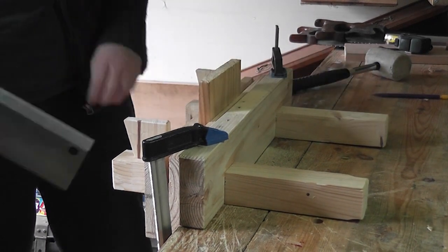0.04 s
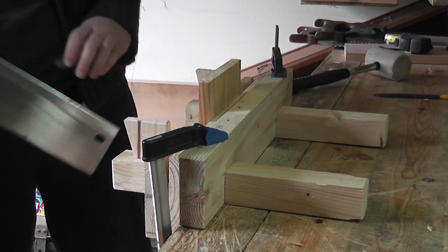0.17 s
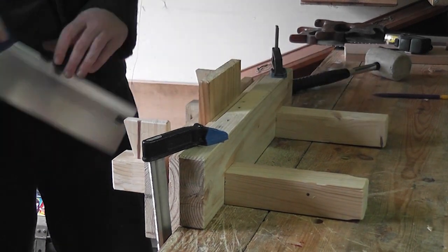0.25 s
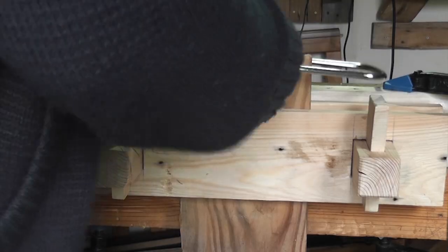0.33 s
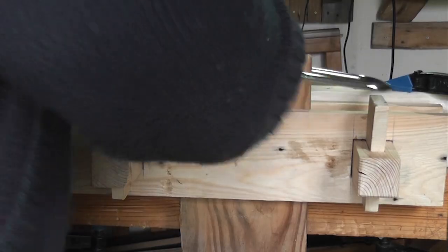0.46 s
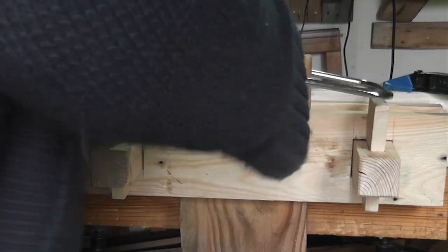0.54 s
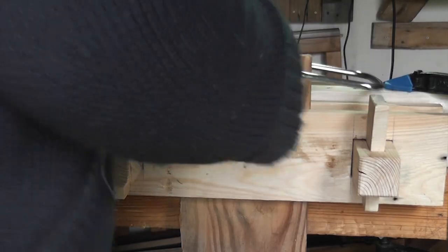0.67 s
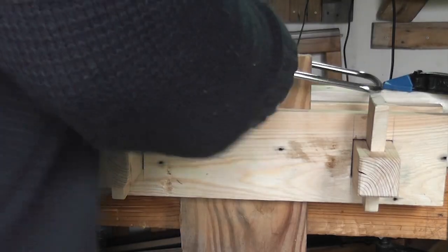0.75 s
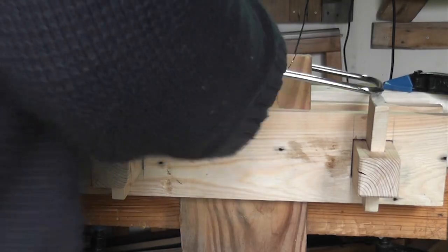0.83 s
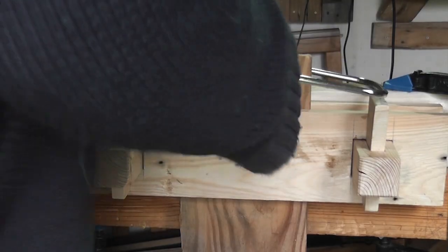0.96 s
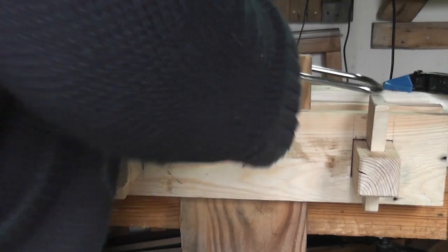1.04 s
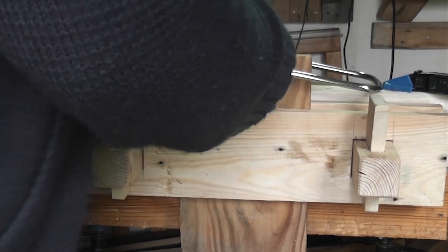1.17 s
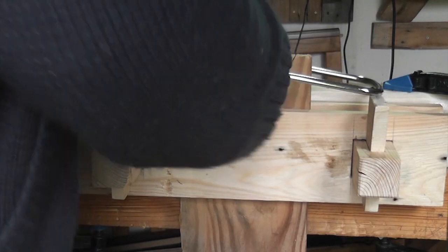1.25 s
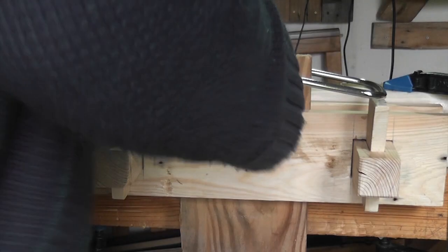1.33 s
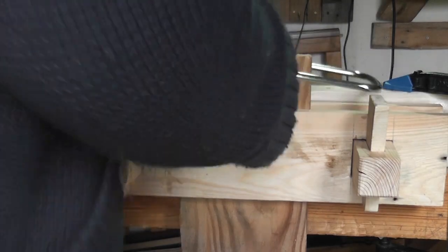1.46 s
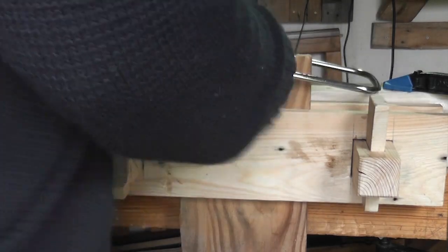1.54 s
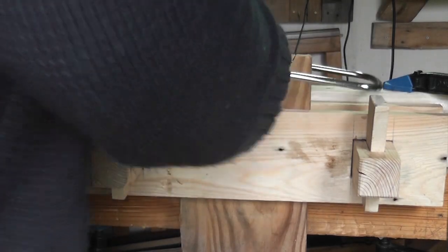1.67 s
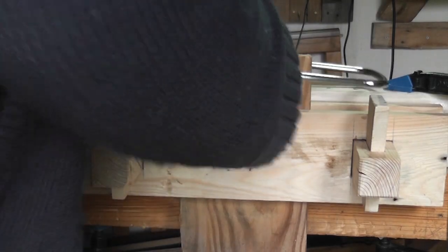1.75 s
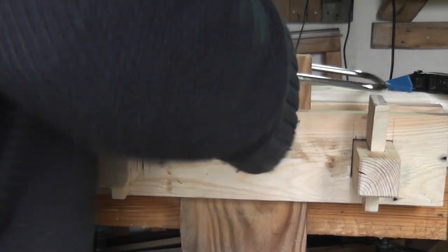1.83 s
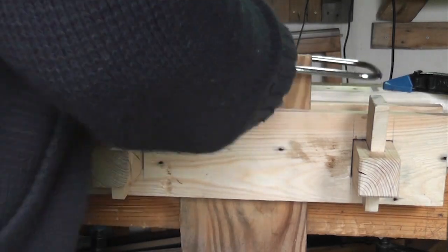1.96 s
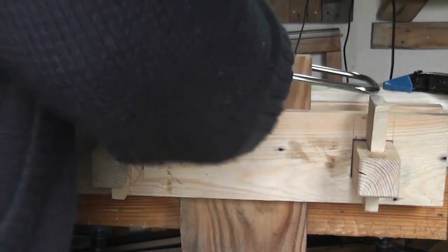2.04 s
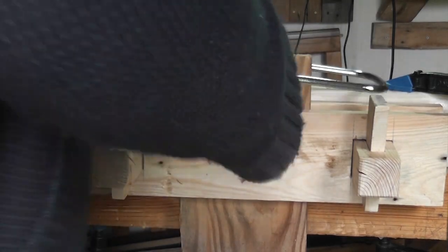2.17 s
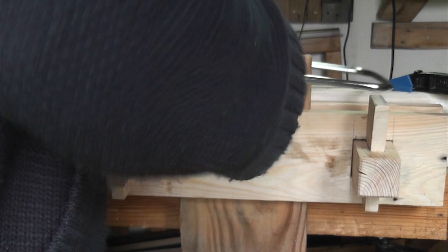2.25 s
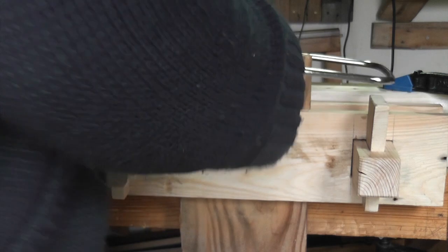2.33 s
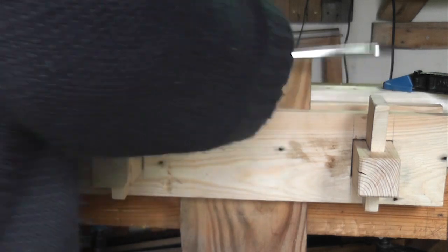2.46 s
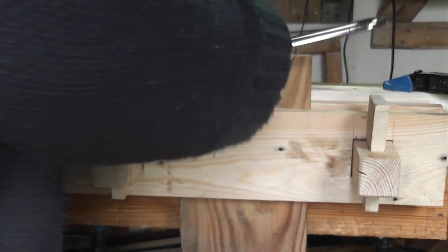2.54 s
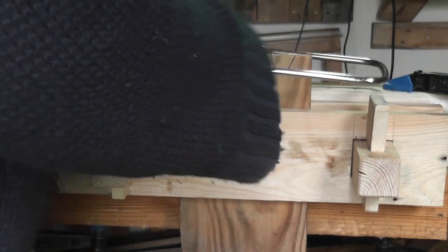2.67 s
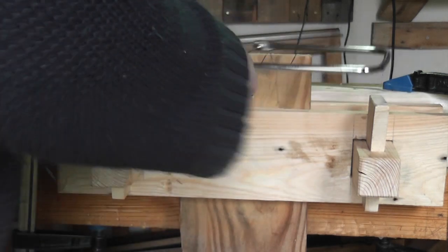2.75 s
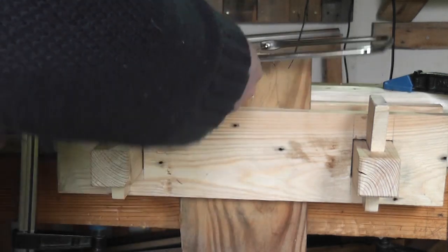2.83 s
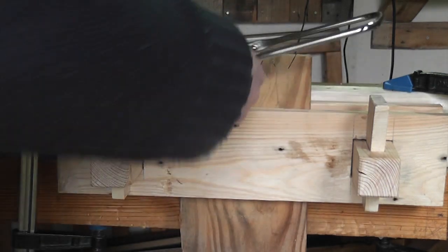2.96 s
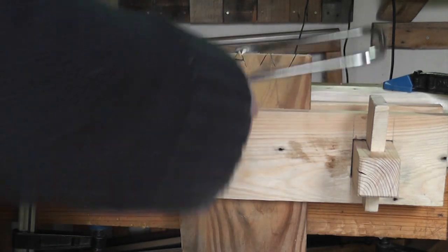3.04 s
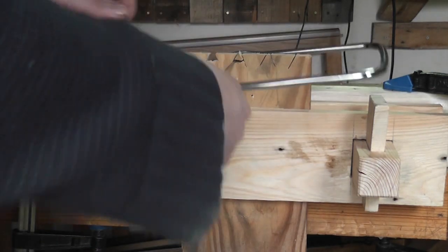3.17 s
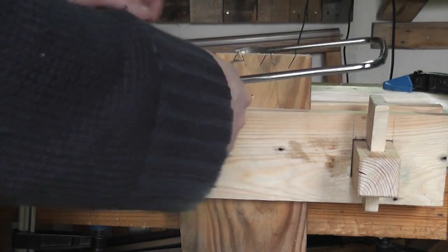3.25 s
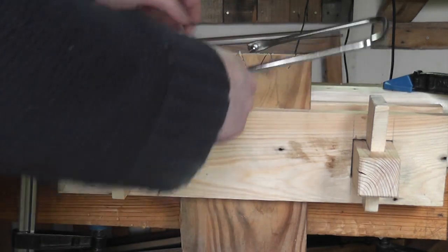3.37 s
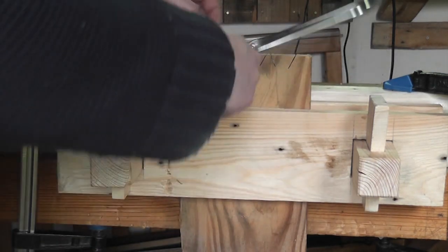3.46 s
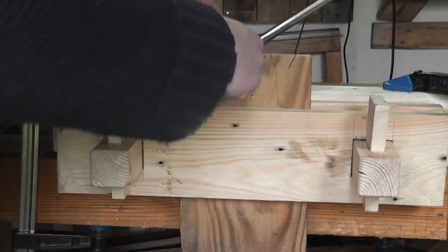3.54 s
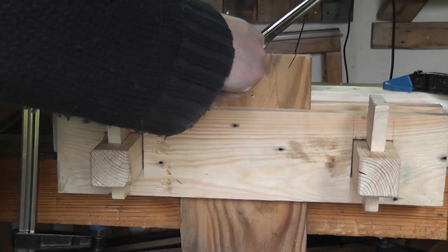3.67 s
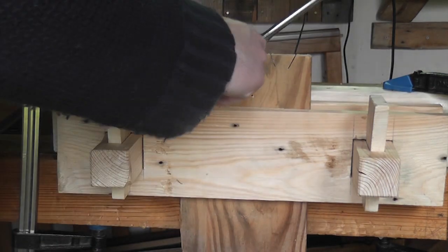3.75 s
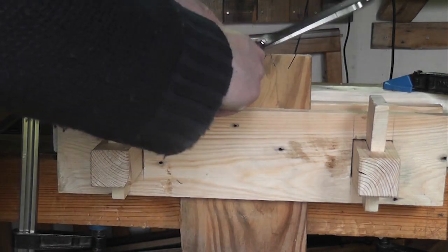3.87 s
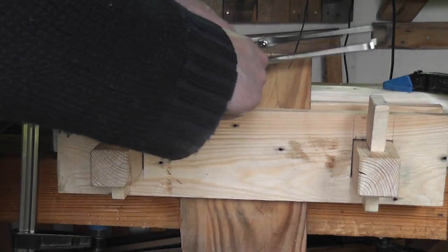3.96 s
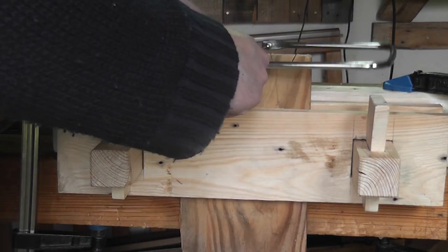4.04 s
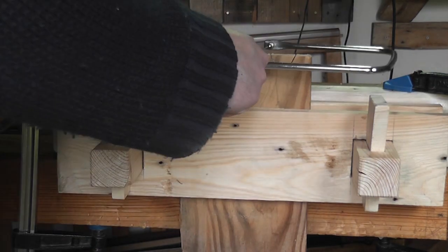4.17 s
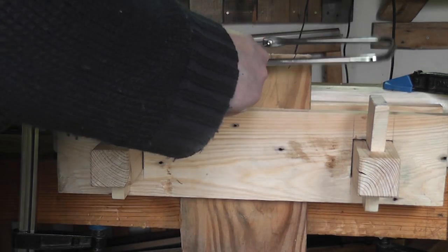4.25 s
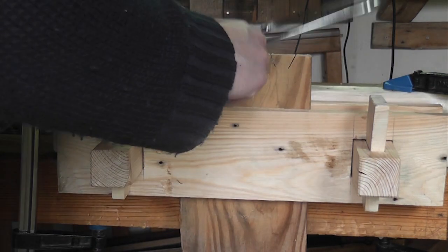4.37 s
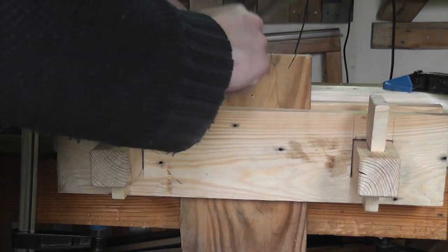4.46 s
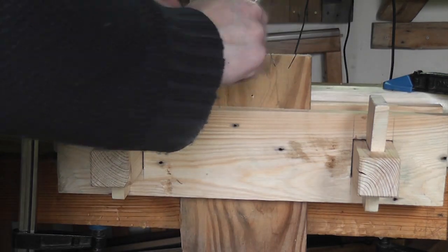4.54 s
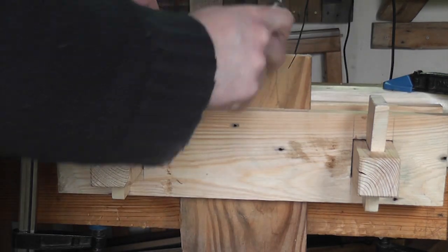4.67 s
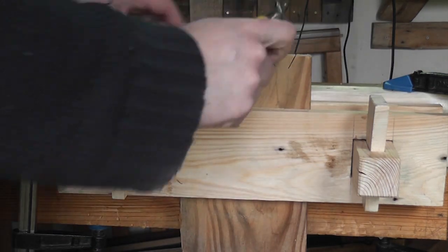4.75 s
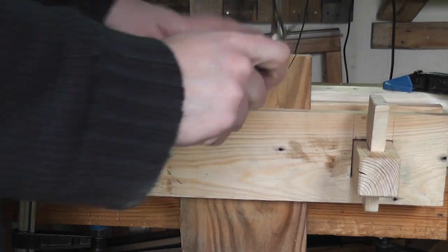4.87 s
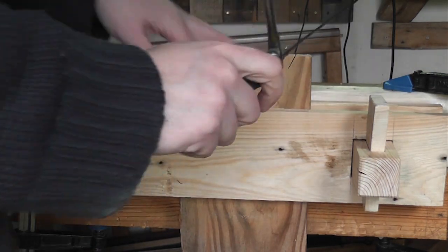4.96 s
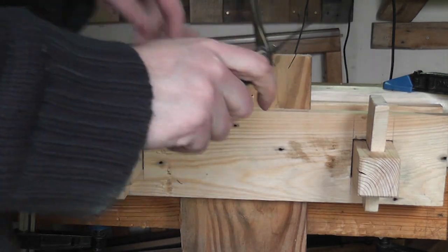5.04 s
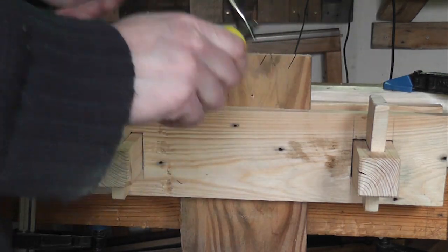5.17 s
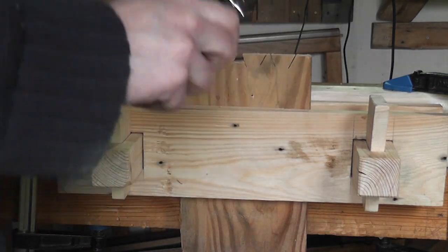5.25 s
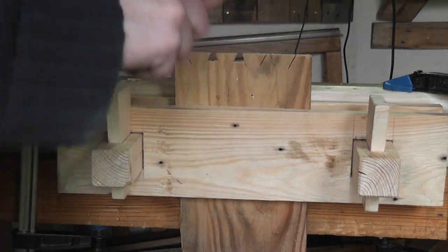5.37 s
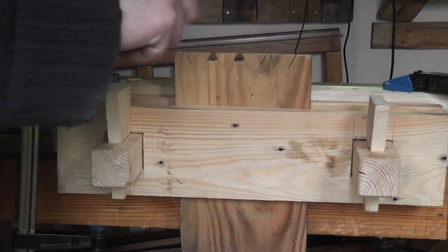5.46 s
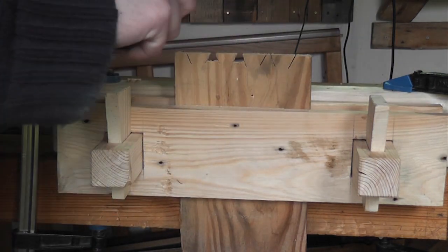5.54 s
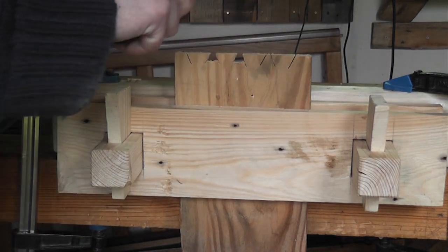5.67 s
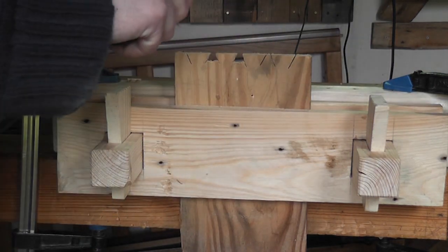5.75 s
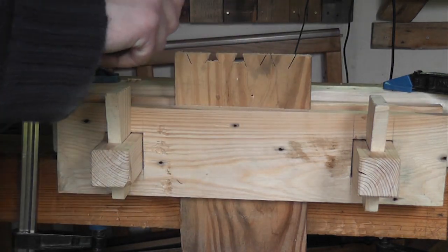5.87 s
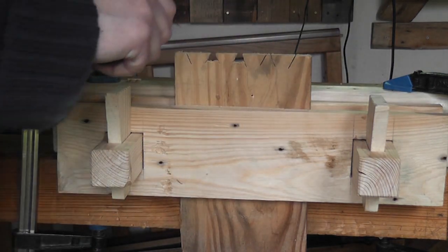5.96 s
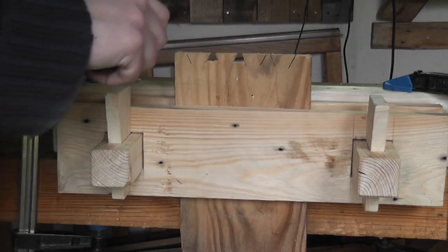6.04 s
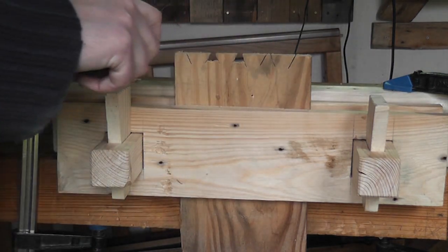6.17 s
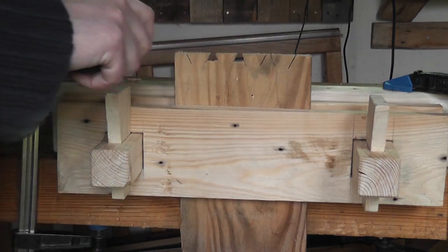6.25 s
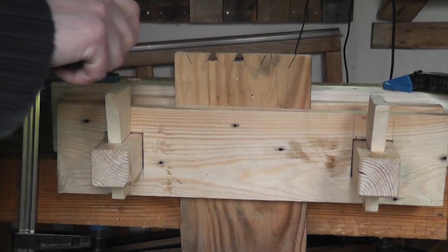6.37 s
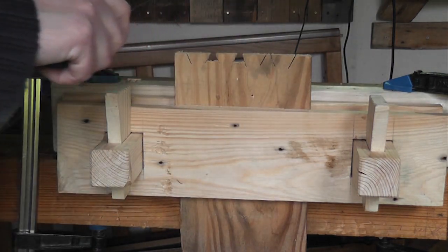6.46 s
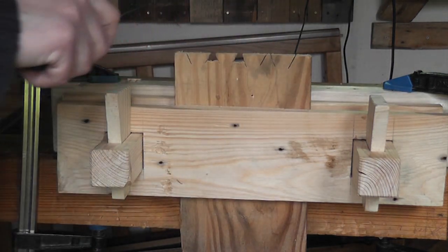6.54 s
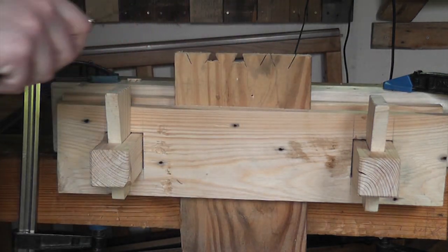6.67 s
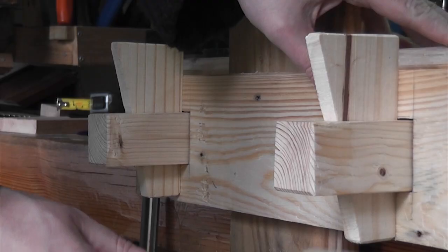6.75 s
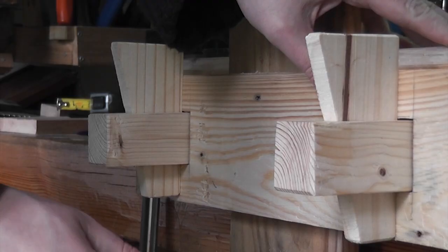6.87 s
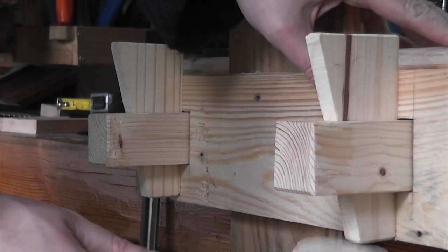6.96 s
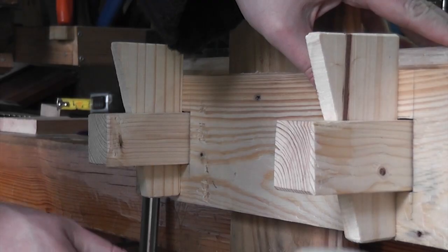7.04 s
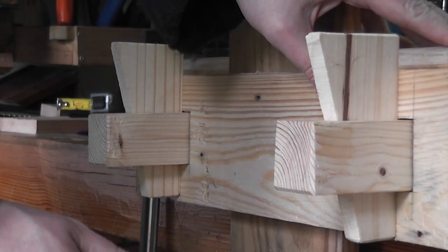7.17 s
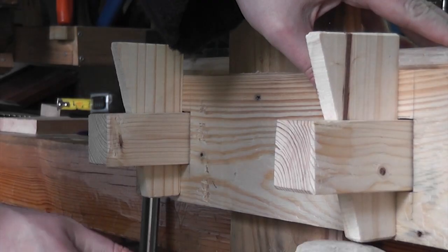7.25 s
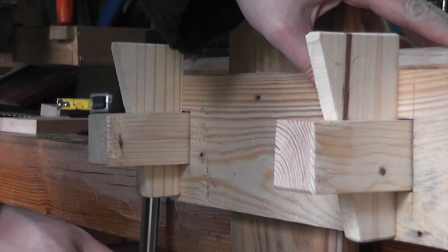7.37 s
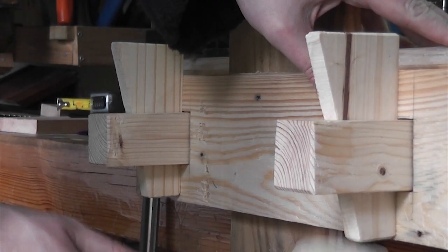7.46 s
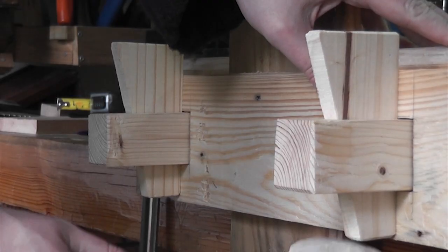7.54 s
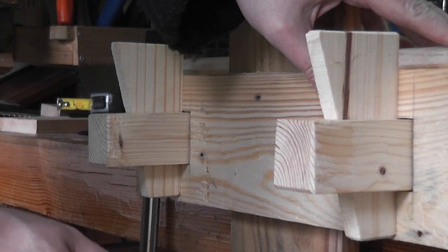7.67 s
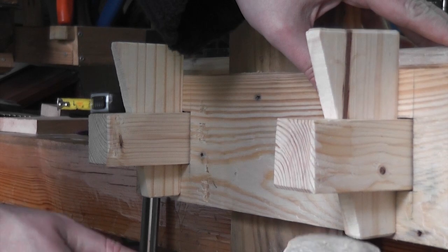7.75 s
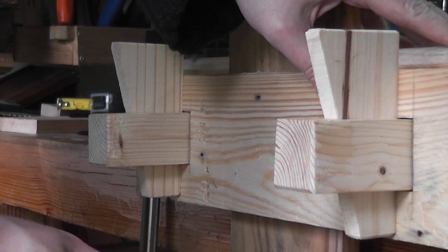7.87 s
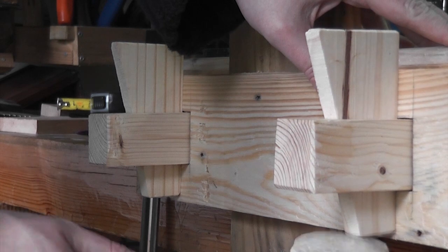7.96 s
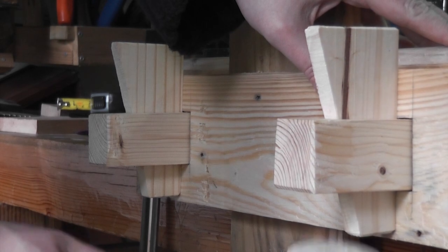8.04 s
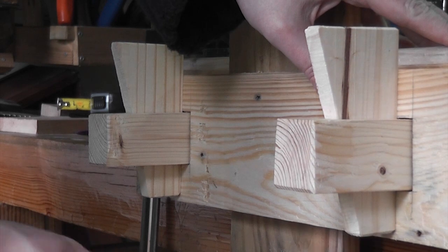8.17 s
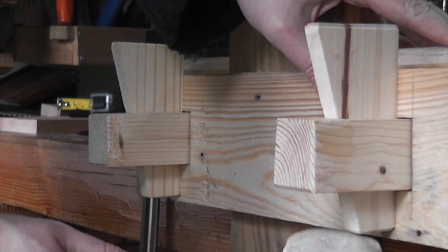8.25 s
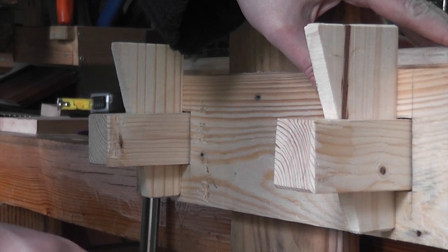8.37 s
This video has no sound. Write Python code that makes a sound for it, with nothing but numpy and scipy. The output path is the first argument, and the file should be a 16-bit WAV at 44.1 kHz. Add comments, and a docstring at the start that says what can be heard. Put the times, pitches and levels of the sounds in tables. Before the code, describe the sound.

Quick hand sawing through wood, a few scrapes and bumps, then seven sharp mallet blows on a wooden wedge in a small workshop.

```python
"""A small workshop: a coping saw cuts a board held in a wooden vice, in quick push-pull strokes, then
lighter ones. Its teeth tear fibres, ringing the board and the taut blade. The blade jerks, the bench
bumps, and the saw is scraped out of the kerf. Then a mallet drives a wedge home in seven blows, each a
crack, a clack and a ring of the vice, the pitch climbing as the wedge tightens. Tools tick and a sleeve
rustles over a steady hush and faint high chirps."""
import sys
import numpy as np
from scipy import signal
from scipy.fft import rfft, irfft, next_fast_len
from scipy.io import wavfile
from scipy.ndimage import uniform_filter1d

SR = 44100
rng = np.random.default_rng(int(sys.argv[2]) if len(sys.argv) > 2 else 0)


def bounce(signal):
    """Save signal as a 16-bit WAV file at the path given by the first command-line argument."""
    frames = np.transpose(np.atleast_2d(signal))
    limited = np.clip(frames, -1, 1)
    pcm = np.round(limited * 32767).astype(np.int16)
    wavfile.write(sys.argv[1], SR, pcm)


N = 370881
T = np.arange(N) / SR

# mallet on the wedge: (time [s], knock [dB], pitch [Hz], spread [octaves], clack [dB], crack [dB])
MALLET_BLOWS = [(6.8602, -24.5, 211, 0.3, -25.5, -16.5), (7.0693, -19.5, 430, 0.93, -14, -15),
                (7.3027, -20.5, 427, 0.59, -15, -20.5), (7.5533, -17, 500, 0.53, -17.5, -17.5),
                (7.8113, -15.5, 566, 0.76, -17, -20.5), (8.0627, -14.5, 547, 0.61, -16.5, -17.5),
                (8.3313, -14.5, 537, 0.6, -16.5, -18.5)]
# bright snap of slipping wood: (frequency [Hz], level [dB])
CRACK_SPECTRUM = [(1200, -63), (2200, 3), (2800, 12.5), (3600, 11), (4300, 3), (5800, 10.5), (7300, 3),
                  (9000, 6.5), (12000, -1.5)]


def sawing():
    """The saw cuts: short pulls and long pushes in turn, then three light strokes."""
    # (start [s], attack [s], hold [s], bite [dB], board ring [dB re bite], hiss [dB re bite])
    strokes = [ (0.349, 0.0013, .025, -24, -3.5, -16), (0.432, 0.032, 0.083, -21, -0.5, -14.5),
               (0.655, 0.076, 0.036, -23, 0, -12), (0.828, 0.038, 0.094, -22.5, 1.5, -14),
               (1.075, 0.058, 0.021, -24, 3, -13), (1.250, 0.023, 0.095, -22.5, 1, -14.5),
               (1.475, .045, 0.052, -24, -5.5, -13), (1.644, 0.0202, .11, -22.5, 1, -14.5),
               (1.885, 0.0593, .055, -25.5, -5, -14), (2.064, 0.027, .11, -22, 1.5, -13.5),
               (2.390, 0.031, 0.028, -29.5, 2, -11), (2.622, 0.011, 0.028, -30.5, 1, -14),
               (2.833, 0.014, 0.043, -31.5, -4, -8)]
    # tone of the cut: (frequency [Hz], level [dB])
    cut_spectrum = [(35, -63), (70, -27.5), (130, -20.5), (310, -13.5), (400, 1.5), (520, -0.5), (590, -5),
                    (700, 1), (950, -4), (1400, -7), (2100, -17), (3000, -20), (5000, -17.5),
                    (11500, -28.5)]
    return blade(strokes, cut_spectrum, twang=5.5, ring=0.98, teeth_per_s=470, chatter=0.08,
                 spread_db=2, bench_db=-35, release_db_per_s=210.5, drag_db=-10.5)


def scraping():
    """The blade is worked loose from the kerf in short, hissy jerks."""
    # (start [s], attack [s], hold [s], bite [dB], board ring [dB re bite], hiss [dB re bite])
    scrapes = [ (3.106, 0.0089, 0.018, -22.5, -9, -7.5), (3.168, 0.0064, 0.0063, -36, -7, -8),
               (3.312, 0.0044, 0.0035, -36.5, -4, -11), (3.490, 0.076, 0.0057, -33, -8, -9.5),
               (3.635, 0.014, .02, -42.5, -6, -10), (3.750, 0.015, 0.0073, -47.5, -1, -15),
               (3.887, 0.0075, 0.0064, -45.5, -2.5, 1), (4.043, 0.0051, 0.0084, -36.5, -3.5, -5),
               (4.496, 0.0037, 0.0098, -37, -3, -7), (4.925, 0.027, .03, -44.5, -5, -4.5),
               (4.985, 0.063, 0.028, -36.5, -10.5, -5.5)]
    # tone of the scrape: (frequency [Hz], level [dB])
    scrape_spectrum = [(50, -29), (90, -3.5), (260, -14), (470, 2.5), (600, -3), (1350, 0), (2500, -14),
                       (3300, -6.5), (6000, -7.5), (11500, -18)]
    return blade(scrapes, scrape_spectrum, twang=0.63, ring=0.8, teeth_per_s=200, chatter=0.12,
                 spread_db=0, bench_db=-38, release_db_per_s=207, drag_db=-19)


def blade(strokes, spectrum, twang, ring, teeth_per_s, chatter, spread_db, bench_db,
          release_db_per_s, drag_db):
    """Teeth snag and tear fibres, shaking the bench and ringing the board and the taut blade."""
    # resonances of board and saw frame: (frequency [Hz], width [Hz], lift [dB, scaled by ring])
    board_modes = [(80, 3.5, 32), (189.2, 32, 22.5), (294, 37, 13), (426, 67, 0.5), (672, 18.4, 17),
                   (775, 68, 4.5), (882.8, 15.7, 10), (1230, 5.3, -5.5), (1345, 15, 11.5), (1561, 19, 11.5),
                   (1824, 71, 6.5), (2178, 200, 10.5), (2278, 30, 6.5), (2785, 260, 8), (4840, 20, 2),
                   (4830, 26, 13.5)]
    bands_hz = [(45, 310), (340, 820), (850, 3150), (3250, 16000)]  # bench, board, bite, hiss
    slack_hz, tension_hz, waver_hz = 455.3, 12, 13
    board_lag_s = 0.0075  # the board takes a moment to answer
    lag = np.exp(-1 / (board_lag_s * SR))
    powers, force = np.zeros((4, N)), np.zeros(N)
    for start, attack_s, hold_s, bite_db, board_db, hiss_db in strokes:
        push = stroke_force(attack_s, hold_s, release_db_per_s, drag_db)
        add(force, start, push)
        levels = (amp(bench_db) * (amp(bite_db) * push) ** 0.4,
                  amp(bite_db + board_db) * signal.lfilter([1 - lag], [1, -lag], push),
                  amp(bite_db) * push,
                  amp(bite_db + hiss_db) * push ** 0.97)
        for power, level in zip(powers, levels):
            add(power, start, level ** 2)
    tooth_rate = teeth_per_s * force ** 0.3 * (1 + 0.146 * wander(size=200))
    grip = 1 + chatter * np.cos(2 * np.pi * np.cumsum(tooth_rate) / SR)
    tearing = grain(grip * (snags(2500, spread_db) + 0.5 * rng.standard_normal(N)))
    twang_hz = slack_hz + tension_hz * force + waver_hz * wander(size=1500)
    tearing = tearing + twang * resonate(tearing, twang_hz, width_hz=36)
    wood = colour(tearing, lambda f: read(spectrum, f) + ring * lift(board_modes, f))
    return sum(np.sqrt(power) * steady(band(wood, *edges)) for power, edges in zip(powers, bands_hz))


def stroke_force(attack_s, hold_s, release_db_per_s, drag_db, sag_db_per_s=17.5, fade_db_per_s=53.5):
    """Force on the teeth, 0-1: it builds, sags, and falls to a fading drag as the saw turns round."""
    t = T[:SR]
    held_s = np.maximum(t - attack_s, 0)
    cutting = amp(-sag_db_per_s * held_s - release_db_per_s * np.maximum(held_s - hold_s, 0))
    drag = amp(drag_db - fade_db_per_s * held_s)
    return np.minimum(t / attack_s, 1) * np.maximum(cutting, drag)


def knock(knock_db, hz, octaves, clack_db, crack_db, body_t60=0.25, slip_s=0.0022):
    """Wood slips with a crack, stops with a clack, and the vice rings around the given pitch."""
    # modes of the wooden vice: (frequency [Hz], relative level [dB], t60 [s])
    vice_modes = [(76.1, -9.5, 0.94), (106.6, -7.5, 0.26), (165.4, -10, 0.21), (223.7, -3, 0.23),
                  (294, -17, 0.53), (438, -1, 0.16), (531, -14.5, 0.85), (655, 7.5, 0.062),
                  (756, 5.5, 0.09), (846, 3, 0.13), (1320, 9, 0.079), (1476, 9, 0.052), (2840, 7, 0.072),
                  (3400, 8, .07)]
    # wood stopping on wood: (frequency [Hz], level [dB])
    clack_spectrum = [(100, -12), (400, -1), (1050, -2), (1450, 2), (1900, -7), (3000, -10.5), (8000, -21)]

    def hump_db(f):
        """A broad peak at the knock's pitch, with the treble rolled off."""
        nearness = np.exp(-(np.log2((f + 1) / hz) / (2 * octaves)) ** 2)
        return -22 * (1 - nearness) - 14 * np.log2(1 + (f / 2400) ** 2)

    t = T[:SR]
    thud = colour(rng.standard_normal(SR), hump_db)
    body = steady(band(thud, 84.5, 12000)) * amp(-60 * t / body_t60)
    modes = sum(amp(db + hump_db(f) / 2 - 60 * t / t60) * np.sin(2 * np.pi * (f * t + rng.random()))
                for f, db, t60 in vice_modes)
    onset = 1 - np.exp(-t / 0.004)
    sound = np.zeros(SR)
    add(sound, 0, amp(crack_db) * burst(CRACK_SPECTRUM, slip_s))
    add(sound, slip_s / 2, amp(clack_db) * burst(clack_spectrum, length_s=0.00563))
    add(sound, slip_s, amp(knock_db) * (body + amp(-6) * modes) * onset)
    return sound


def knocks(blows):
    """A run of blows, each ringing the vice."""
    out = np.zeros(N)
    for start, *blow in blows:
        add(out, start, knock(*blow))
    return out


def jolts(step_db=-4, hz=170, fade_s=0.0029, delay_s=0.0013):
    """Each blow jolts the microphone, its sides in opposite senses, less as the wedge stops slipping."""
    out, t = np.zeros(N), T[:SR // 10]
    thump = np.exp(-t / fade_s) * np.sin(2 * np.pi * hz * t)
    for k, (start, *_) in enumerate(MALLET_BLOWS):
        add(out, start + delay_s, amp(-14 + k * step_db) * thump)
    return np.array([out / 2, -out])


def bumps():
    """The board bumps in the vice."""
    # (time [s], knock [dB], pitch [Hz], spread [octaves], clack [dB], crack [dB])
    board_bumps = [(0.808, -28, 192, 0.21, -43, -58), (0.860, -31, 195, 0.93, -49, -55),
                   (1.61, -30.5, 291, 0.72, -45, -58), (3.174, -17, 623.5, .6, -18, -26.5),
                   (3.19, -20, 268, 0.71, -45, -37), (3.215, -25.5, 76.7, 0.16, -45, -50),
                   (4.418, -37, 360, 0.47, -51, -67), (5.446, -49, 1000, 0.57, -50, -56)]
    return knocks(board_bumps)


def sleeve():
    """A woollen sleeve brushes the wood in swells of tiny snags."""
    # swells of the rustle: (time [s], level [dB])
    swells = [(2.3, -83), (2.6, -45.5), (3.001, -50), (3.301, -50), (3.65, -46.5), (3.82, -61), (4.3, -74),
              (4.68, -59.5), (4.9, -67), (5.201, -67), (5.41, -57), (5.55, -68)]
    # tone of wool on wood: (frequency [Hz], level [dB])
    wool_spectrum = [(1500, -25), (4000, -1), (5600, 5), (7000, -4.5), (12000, -8.5)]
    fibres = colour(snags(2500, spread_db=0.7), lambda f: read(wool_spectrum, f))
    level_db = np.interp(T, *np.transpose(swells), left=-120, right=-120)
    return amp(level_db) * unit(grain(fibres, patchy_db=3.5))


def tool_ticks():
    """Tools tick as they are handled: tiny cracks, some dull, some bright."""
    # (time [s], level [dB], brightness [dB per octave])
    ticks = [(0.352, -42, 4), (2.721, -48, -4), (3.895, -37.5, 1.5), (4.026, -47, -3), (4.048, -42, 12),
             (4.5, -33.5, -8), (4.651, -55, 1), (4.798, -53, 0), (4.817, -47.5, 0), (5.25, -52, 3),
             (5.447, -46.5, -1), (5.464, -54, 0), (7.017, -45.5, 13)]
    out = np.zeros(N)
    for start, db, tilt in ticks:
        spectrum = [(hz, level + tilt * np.log2(hz / 4000)) for hz, level in CRACK_SPECTRUM]
        add(out, start, amp(db) * burst(spectrum, length_s=0.0042))
    return out


def chirps(length_s=0.13, width_hz=130, glide=0.025, twitter_hz=4680, twitter_db=-68):
    """Faint, blurred high chirps, each gliding a little, over a still fainter twitter."""
    # (midpoint [s], pitch [Hz], level [dB])
    calls = [(3.88, 4300, -62), (4.24, 4660, -58), (4.34, 4940, -57.5), (4.65, 4320, -57),
             (4.769, 4830, -63), (5.64, 4700, -62), (5.93, 4300, -63), (6.11, 4420, -62), (6.73, 4400, -66)]
    out, size = np.zeros(N), round(length_s * SR)
    first, last = calls[0][0], calls[-1][0]
    twitter = [(first + (last - first) * when, twitter_hz * (1 + 0.044 * (2 * high - 1)), twitter_db)
               for when, high in rng.random((18, 2))]
    for midpoint, hz, db in calls + twitter:
        pitch = hz * (1 + glide * rng.uniform(-1, 1) * np.linspace(-1, 1, size))
        whistle = resonate(rng.standard_normal(size), pitch, width_hz)
        tone = resonate(whistle, pitch, 2 * width_hz)
        add(out, midpoint - length_s / 2, amp(db) * unit(tone) * np.hanning(size))
    return out


def air(level_db=-52):
    """Room tone: the steady hush of the workshop."""
    # tone of the hush: (frequency [Hz], level [dB])
    hush_spectrum = [(15, -32), (25, -52), (59, 5.5), (121, -1), (178, 0.5), (269, -4), (463, -1.5),
                     (569, -4), (1090, -5), (1200, -8), (2180, -10.5), (3850, -16.5), (4380, -17.5),
                     (4990, -21.5), (12000, -32), (15600, -35), (22000, -120)]
    # faint pitches in it: (frequency [Hz], width [Hz], lift [dB])
    hush_peaks = [(180, 10, 4), (1058, 27, 9), (2094, 26, 8), (4900, 160, 6)]
    mid, side = (unit(colour(noise, lambda f: read(hush_spectrum, f) + lift(hush_peaks, f)))
                 for noise in rng.standard_normal((2, N)))
    return amp(level_db) * stereo(mid, amp(-1) * side)


def workshop(x, wet_db, side_db, gap_s=0.0056, echoes_per_s=4000):
    """Direct sound plus dense reflections from near walls, the treble dying first."""
    # decay of the room: (frequency [Hz], t60 [s])
    decay_times = [(80, 0.49), (200, 0.29), (450, 0.27), (1100, 0.24), (3000, 0.26), (8000, 0.17)]
    signs = rng.choice([-1., 1.], (2, SR))
    echoes = signs * (rng.random((2, SR)) < echoes_per_s / SR) * (T[:SR] > gap_s)
    hz, t, spectra = signal.stft(echoes, SR, nperseg=256)
    decay = amp(-60 * t / read(decay_times, hz)[:, None])
    tails = signal.istft(spectra * decay, SR, nperseg=256)[1]
    mid, side = (signal.oaconvolve(x, tail / np.linalg.norm(tail))[:N] for tail in tails)
    return stereo(x + amp(wet_db) * mid, amp(side_db) * side)


def stereo(mid, side, lean=0.17):
    """The image is widest in the bass and mids and leans a little to the right."""
    # stereo width: (frequency [Hz], side gain [dB])
    width = [(30, -9), (100, -10), (280, -13), (600, -9.5), (1100, -8), (2000, -12), (3700, -30),
             (7000, -38), (12000, -28)]
    side = colour(side - lean * mid, lambda f: read(width, f))
    return np.array([mid + side, mid - side])


def snags(per_s, spread_db):
    """Catching fibres: random clicks, a few standing out as spread_db grows."""
    size = amp(spread_db * np.minimum(rng.exponential(1, N), 4))
    return unit(size * rng.choice([-1., 1.], N) * (rng.random(N) < per_s / SR))


def grain(x, patchy_db=2.0):
    """The colour shifts in random patches, as when teeth pass hard and soft wood."""
    spectra = signal.stft(x, nperseg=512)[2]
    across_pitch = uniform_filter1d(rng.standard_normal(spectra.shape), size=7, axis=0)
    patches = unit(uniform_filter1d(across_pitch, size=12, axis=1))
    return signal.istft(spectra * amp(patchy_db * patches), nperseg=512)[1][:N]


def burst(spectrum, length_s):
    """A short puff of contact noise with the given spectrum, rms 1 over its length."""
    fade = np.exp(-(T[:SR // 10] / length_s) ** 2)
    puff = fade * rng.standard_normal(len(fade))
    for _ in range(6):  # flatten the spectrum while keeping the puff short
        puff = fade ** 0.25 * irfft(np.exp(1j * np.angle(rfft(puff))))
    puff = colour(puff, lambda f: read(spectrum, f), size=1024)
    return puff * np.sqrt(length_s * SR / np.sum(puff ** 2))


def resonate(x, hz, width_hz):
    """A resonance of gain 1 that follows a pitch curve."""
    turn = np.exp(2j * np.pi * np.cumsum(hz) / SR)
    pole = np.exp(-np.pi * width_hz / SR)
    return 2 * (turn * signal.lfilter([1 - pole], [1, -pole], x / turn)).real


def colour(x, gain_db, size=8192):
    """Causal EQ whose gain in dB is a function of frequency."""
    hz = abs(np.fft.fftfreq(size, 1 / SR))
    log_gain = np.log(np.maximum(amp(gain_db(hz)), 1e-5))
    taps = np.fft.ifft(np.exp(np.conj(signal.hilbert(log_gain)))).real[:size // 2]
    return signal.oaconvolve(x, taps)[:len(x)]


def band(x, lo_hz, hi_hz):
    """Soft-edged band of a sound."""
    size = next_fast_len(len(x))
    f = np.fft.rfftfreq(size, 1 / SR) + 1
    gain = 1 / (1 + (lo_hz / f) ** 12 + (f / hi_hz) ** 12)
    return irfft(rfft(x, size) * gain, size)[:len(x)]


def steady(x, size=900):
    """Holds the loudness even over some 20 ms, leaving the finer grain."""
    return x / np.sqrt(abs(uniform_filter1d(uniform_filter1d(x ** 2, size), size)) + 1e-20)


def wander(size):
    """Random drift of rms 1 that changes over about size samples."""
    return unit(uniform_filter1d(uniform_filter1d(rng.standard_normal(N), size), size))


def lift(peaks, f):
    """Gain in dB of a set of resonances."""
    return sum(db / (1 + (2 * (f - hz) / width) ** 2) for hz, width, db in peaks)


def read(points, hz):
    """Reads a table on a log-frequency axis."""
    f, value = np.transpose(points)
    return np.interp(np.log(hz + 1), np.log(f + 1), value)


def add(mix, start_s, sound):
    """Mixes a sound in at its start time."""
    part = mix[round(start_s * SR):][:len(sound)]
    part += sound[:len(part)]


def amp(db):
    """Decibels to gain."""
    return 10 ** (np.asarray(db) / 20)


def unit(x):
    """Scales to rms 1."""
    return x / np.sqrt(np.mean(x ** 2) + 1e-20)


def scene():
    """Sawing, freeing the blade, then the mallet."""
    saw = workshop(sawing() + scraping() + bumps(), wet_db=-8.5, side_db=-6.5)
    # the mallet lands a little differently, so its blows alternate between two sets of reflections
    groups = (knocks(MALLET_BLOWS[::2]), knocks(MALLET_BLOWS[1::2]) + sleeve() + tool_ticks())
    mallet_and_handling = sum(workshop(group, wet_db=-5, side_db=-3) for group in groups)
    return saw + mallet_and_handling + jolts() + air() + chirps()


def record(dry):
    """A steep low-pass takes off the top treble."""
    lowpass = signal.firwin(255, cutoff=12100, window=("kaiser", 9), fs=SR)
    return signal.oaconvolve(dry, lowpass[None], "same")


dry = scene()
out = record(dry)
bounce(out)
```